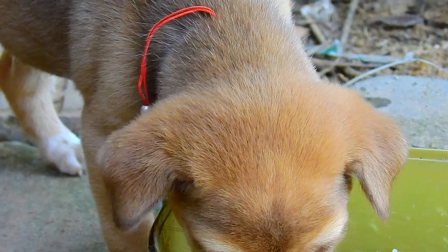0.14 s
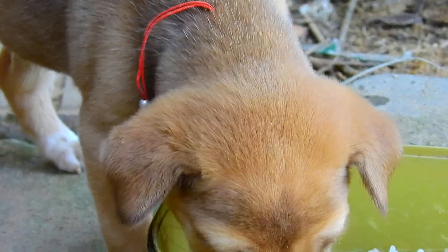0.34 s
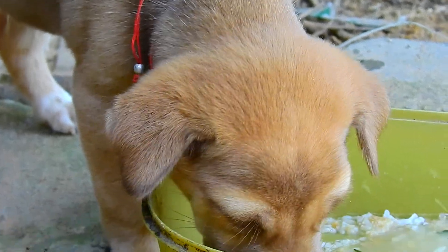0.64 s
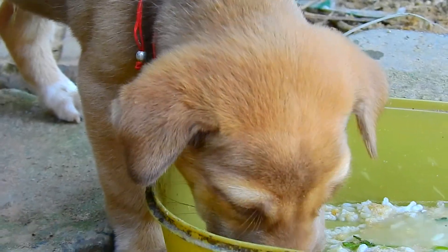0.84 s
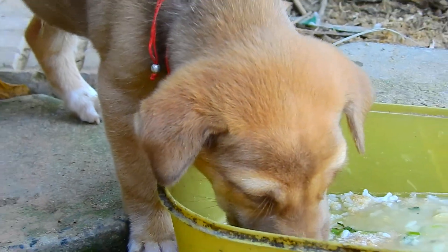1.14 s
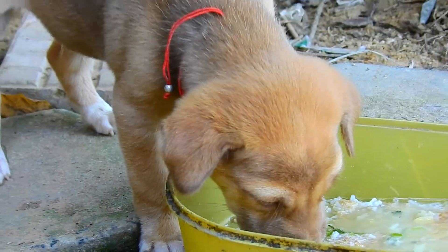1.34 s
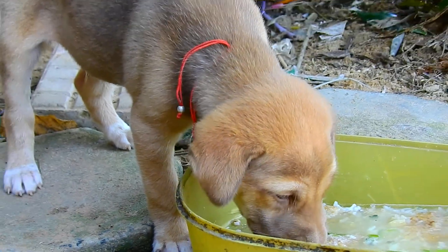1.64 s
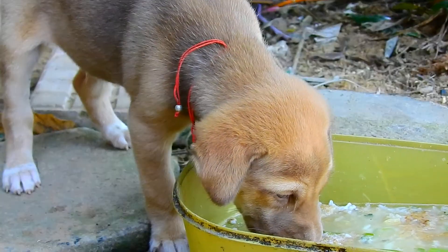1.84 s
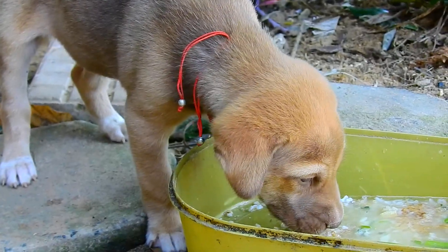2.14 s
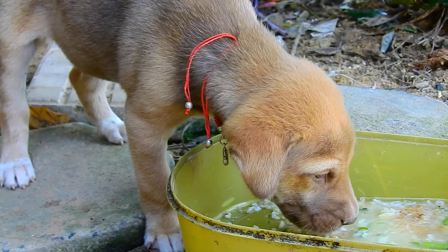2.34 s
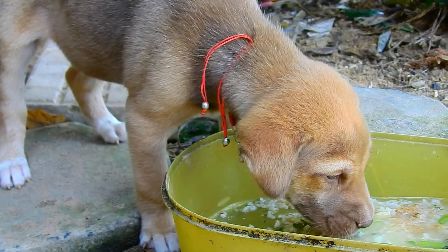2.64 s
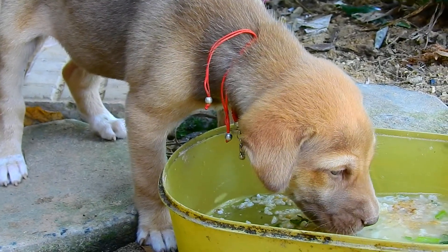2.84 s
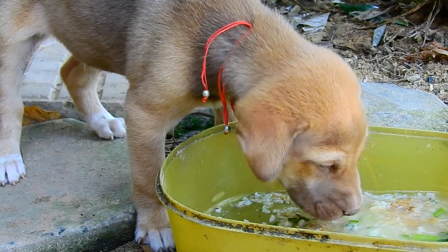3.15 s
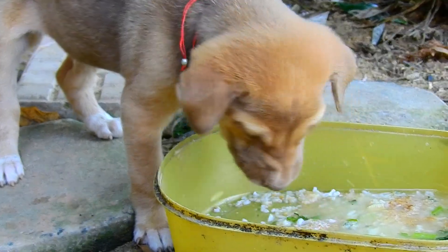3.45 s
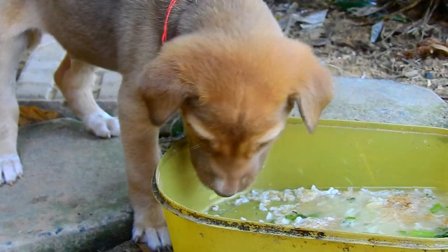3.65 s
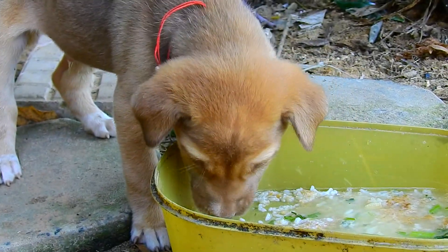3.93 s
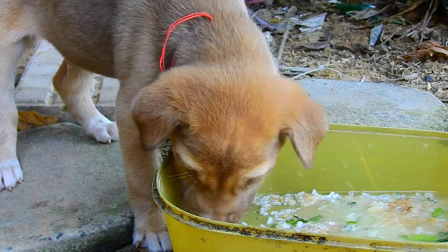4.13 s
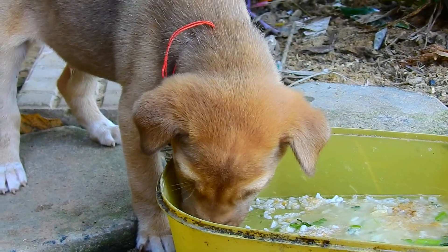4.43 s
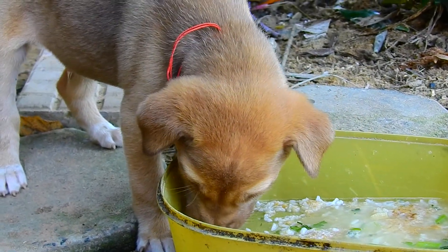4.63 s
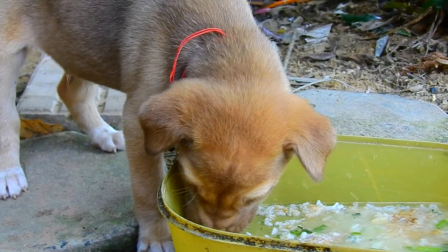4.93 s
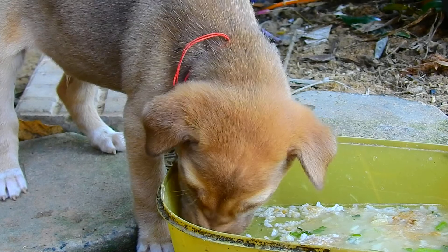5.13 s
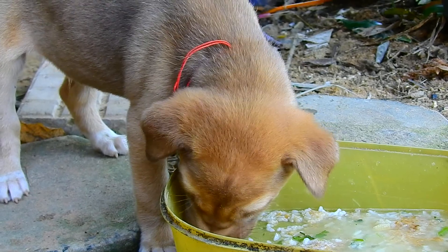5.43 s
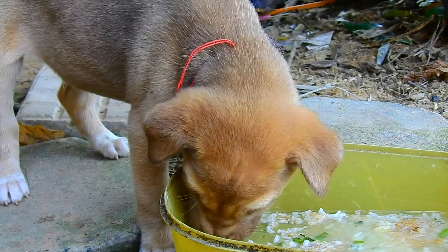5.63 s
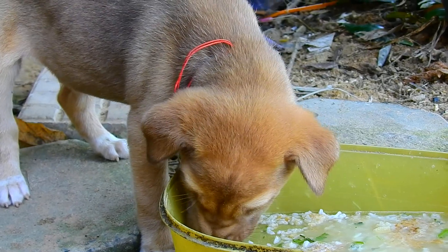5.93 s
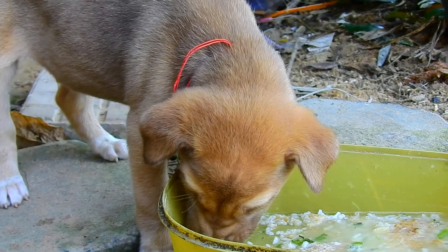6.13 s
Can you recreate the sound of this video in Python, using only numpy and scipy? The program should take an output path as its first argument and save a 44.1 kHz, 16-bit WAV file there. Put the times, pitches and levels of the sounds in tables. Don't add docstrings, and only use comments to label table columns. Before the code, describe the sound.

A close stereo outdoor pickup of a puppy lapping watery rice from a plastic tub. From the start, small wet licks and smacks come irregularly, growing busier at 0.8-1.3 s with bright, fizzy spray and crisp lip clicks; a faint, wavering far whine sounds around 1-1.8 s. Slurps and bubbly gulps continue to about 2.3 s. From 2.4 to 3.1 s the lapping thins as the tub is shoved, giving short gritty scrapes, hollow low knocks and small slips on concrete. Wet smacks return at 3.3 s, with gurgles, building to the juiciest, loudest churning at 3.9-4.6 s. Sharp clicks follow near 4.85 and 5.3 s amid sparser licks. Around 5.9-6.2 s bubbles pop and the tub scrapes and thumps, hardest near 6.05 s. Soft traffic rumble, distant engine idle and airy hiss run throughout.

```python
import sys
import numpy as np
from scipy import signal
from scipy.fft import rfft, irfft
from scipy.io import wavfile
from scipy.ndimage import uniform_filter1d

SR = 44100
rng = np.random.default_rng(int(sys.argv[2]) if len(sys.argv) > 2 else 0)


def field_ratio(decibels):
    return 10 ** (np.asarray(decibels, dtype=float) / 20)


def transcribe(u):
    v = np.clip(np.atleast_2d(u).T, -1, 1)
    q = np.round(v * 32767).astype(np.int16)
    wavfile.write(sys.argv[1], SR, q)


N = 276948

# freq_hz, level_db
YARD_SPECTRUM = [(15, -42), (25, -12.5), (70, 2.5), (133, 1.5), (165, 0.5), (240, -13.5), (553, -13),
                 (763, -15.5), (973, -13.5), (1960, -18.5), (2370, -12), (5450, -26), (6580, -6.5),
                 (7330, -10), (15600, -45)]
# time_s, gain_db
TRAFFIC_SWELL = [
    (0, 3.5),
    (1, 2),
    (2, 6),
    (2.5, 1),
    (3.5, 2.5),
    (4.2, 3),
    (5, 2.5),
    (6.3, 4.5),
]
# time_s, firing_hz, level_db
ENGINE_IDLE = [
    (0, 26.52, -49),
    (1, 26.39, -52),
    (1.7, 27.11, -50),
    (2.7, 27.73, -50.5),
    (3.6, 27.2, -58),
    (4.3, 26.74, -49.5),
    (5, 26.23, -54),
    (6.3, 26.45, -53),
]
# multiple, level_db
ENGINE_ORDERS = [(3, -2), (4, -2), (5, -1), (6, -2), (7, -8.5)]
# time_s, effort_db
CHURN_EFFORT = [(.09, -35), (.47, -34), (.93, -22.5), (1.15, -19), (1.5, -28.5), (1.9, -32), (2.3, -49),
                (2.74, -39), (2.85, -28), (3.3, -30.5), (3.45, -35), (3.84, -27.5), (3.92, -26.5),
                (4.26, -18.5), (4.59, -26.5), (4.83, -32.5), (5.7, -35), (6.28, -32)]
# freq_hz, level_db
FIZZ_SPECTRUM = [(2060, -26.5), (3500, -10.5), (5590, -1), (6330, 4.5), (6960, 4.5), (15600, -40)]
# freq_hz, level_db
SLOSH_SPECTRUM = [(290, -10.5), (500, -8), (762, -8), (931, -6.5), (1730, -6), (5500, -1), (7150, -5.5),
                  (12100, -120)]
# start_s, peak_db, t60_s
SPRAYS = [(.0844, -23, 0.56), (0.276, -15.5, 0.057), (0.539, -17, 0.041), (0.702, -11.5, 0.09),
          (.8531, -12, 0.2), (1.1345, -12, 0.084), (1.1894, -10, 0.09), (1.537, -13, .12),
          (1.768, -15.5, 0.26), (1.908, -8.5, 0.18), (2.048, -15, 0.25), (2.114, -16, 0.23),
          (2.241, -12.5, 0.14), (3.336, -14.5, 0.14), (3.5056, -15.5, 0.09), (3.6323, -19, 0.11),
          (3.904, -9.5, 0.2), (3.966, -7, 0.091), (4.0553, -8, 0.12), (4.2394, -8, 0.057),
          (4.29, -5, 0.078), (4.412, -10, 0.14), (4.4704, -11, 0.28), (4.7228, -20.5, 0.17),
          (5.13, -16.5, 0.22), (5.264, -16, 0.2), (5.452, -14.5, 0.14), (5.487, -10.5, 0.11),
          (5.94, -16, 0.32), (.108, -21, .06), (.18, -19.5, 0.15), (.915, -14, 0.2), (.955, -13, 0.099),
          (1.04, -18, 0.24), (1.0996, -11, .1), (1.25, -15, 0.08), (1.3415, -13, 0.16), (1.675, -22, 0.62),
          (2.2, -17.5, 0.23), (2.305, -21.5, 0.22), (2.385, -21.5, 0.24), (3.922, -13, .06),
          (4.0239, -16, 0.052), (4.0668, -9, .1), (4.1546, -23, 0.079), (4.2, -19, .2), (4.2715, -10, .03),
          (4.335, -11.5, 0.17), (4.5806, -12.5, 0.18), (5.2831, -23, 0.032), (5.34, -19, 0.11),
          (5.5499, -16, 0.11), (5.67, -19.5, 0.19), (6.065, -22, 0.18)]
# start_s, peak_db, t60_s
LIP_SPRAYS = [(.8531, -11, .03), (1.929, -9, .03), (2.55, -24, .12), (2.675, -28, .2), (3.3335, -12, .035),
              (3.3465, -12, .02), (3.626, -19, .06), (4.0553, -7, .04), (4.292, -4, .03),
              (4.7225, -14, .025), (4.73, -18, .05), (4.846, -13, .06), (4.858, -11, .06),
              (5.7769, -17, .03)]
# start_s, peak_db, cavity_hz, t60_s
LAPS = [(0.391, -27.5, 2280, 0.074), (.6556, -25, 2790, 0.52), (0.683, -26, 2720, 0.13),
        (0.845, -24, 2330, 0.25), (1.04, -29, 2000, 0.091), (1.0663, -21.5, 2500, 0.21),
        (1.1185, -23, 3630, 0.19), (1.326, -20.5, 4400, 0.13), (1.4928, -24.5, 2330, 0.1),
        (1.588, -25, 4400, 0.14), (1.621, -21, 2950, 0.24), (1.7595, -21, 2410, 0.09),
        (1.77, -21, 4100, .15), (2.0299, -30.5, 3020, 0.15), (2.07, -27, 4215, 0.29),
        (2.369, -25, 2720, 0.067), (2.575, -23.5, 2060, 0.12), (3.318, -31, 2300, 0.34),
        (3.6153, -25.5, 2800, 0.25), (3.634, -26.5, 1913, 0.22), (3.655, -22, 2540, 0.13),
        (3.9362, -21.5, 2450, 0.29), (4.321, -27, 2760, 0.079), (4.488, -21.5, 4100, 0.096),
        (4.56, -19.5, 4970, 0.45), (4.837, -18.5, 4070, 0.15), (4.846, -15, 4670, 0.19),
        (4.916, -39, 3800, 0.085), (5.0246, -35, 3970, 0.092), (5.109, -23.5, 3900, 0.31),
        (5.334, -33, 4660, 0.084), (5.541, -24, 4960, 0.11), (6.191, -27, 2040, 0.29)]
# start_s, peak_db, cavity_hz, t60_s
GULPS = [(0.075, -24.5, 1950, 0.41), (.345, -31, 2150, 0.081), (0.762, -21.5, 3500, 0.22),
         (0.882, -22, 3650, 0.083), (1.201, -20.5, 2155, 0.16), (1.201, -43, 4690, 0.2),
         (1.9237, -26, 4500, 0.09), (2.221, -19.5, 2660, 0.17), (2.477, -33, 1950, 0.08),
         (2.484, -24, 4080, 0.13), (2.755, -28, 2500, 1), (3.49, -22, 3270, 0.23), (3.85, -16, 3400, 0.32),
         (3.893, -23, 4500, 0.09), (3.976, -20.5, 2620, 0.12), (4.022, -25, 4170, .15),
         (4.0654, -26.5, 4600, 0.18), (4.187, -14, 3900, 0.34), (4.23, -20.5, 3160, 0.75),
         (4.835, -25, 2090, 0.026), (5.6688, -26, 2260, 0.17), (5.711, -26.5, 4600, 0.15),
         (5.8894, -23.5, 4350, .17), (5.93, -23.5, 1370, 0.5)]
# start_s, peak_db, cavity_hz, t60_s
GURGLES = [(.49, -33, 1030, 0.24), (.73, -30.5, 550, 0.17), (1.08, -31, 267, 0.22), (1.29, -32, 360, 0.26),
           (1.627, -19, 3050, 0.075), (1.76, -22, 2270, .12), (1.87, -23.5, 430, 0.046),
           (2.57, -30.5, 595, 0.23), (2.82, -29, 1280, 0.47), (2.89, -28, 1200, .1), (3.02, -29, 1400, .3),
           (3.36, -28.5, 484, 0.26), (3.41, -31, 1300, 0.13), (3.435, -24.5, 880, 0.18),
           (3.555, -27, 945, 0.24), (3.59, -27, 610, 0.14), (3.645, -30, 1600, .15),
           (3.72, -24, 1300, 0.087), (3.755, -33, 590, 0.17), (3.81, -27, 1420, 0.16),
           (3.84, -23, 660, 0.047), (3.88, -28, 890, 0.064), (4.005, -30, 1040, .08),
           (4.22, -32, 540, 0.83), (4.23, -28, 1150, 0.72), (4.35, -28, 520, 0.089),
           (4.72, -28.5, 1080, 0.056), (5.075, -34, 1000, 0.23), (5.2, -34, 1630, 0.34),
           (5.47, -29, 900, 0.092), (5.69, -27.5, 1300, 0.088)]
# start_s, peak_db, cavity_hz, t60_s
POCKETS = [
    (.125, -33, 1150, .2),
    (2.485, -33, 1000, .3),
    (3.1, -27, 1420, .2),
    (3.25, -34, 2400, .3),
    (4.906, -31, 1500, .12),
    (5.48, -24, 3950, .3),
    (5.485, -24, 5050, .1),
    (5.645, -28, 1420, .12),
    (5.655, -27, 2450, .12),
    (5.735, -31, 1950, .1),
]
# start_s, peak_db, pitch_hz, t60_s
BUBBLES = [(0.279, -22.5, 1140, 0.02), (0.386, -33, 810, 0.021), (0.866, -30, 287, 0.099),
           (1.87, -26.5, 1097, 0.046), (1.916, -26.5, 870, 0.04), (1.926, -23, 940, 0.027),
           (2.215, -30.5, 1040, 0.037), (2.676, -25.5, 1020, 0.014), (2.749, -35, 656, 0.11),
           (3.019, -19, 950, 0.022), (3.344, -30, 830, 0.051), (3.628, -23, 900, 0.046),
           (3.719, -18, 1410, 0.028), (3.727, -33, 1090, 0.07), (3.777, -29.5, 730, 0.037),
           (3.81, -31, 1360, 0.024), (3.882, -29, 1496, 0.06), (4.636, -28, 1130, 0.023),
           (4.837, -32, 1330, 0.047), (4.906, -30, 1520, 0.057), (4.962, -30, 1270, 0.03),
           (5.202, -27, 1248, 0.021), (5.234, -26, 1380, 0.03), (5.527, -31.5, 1320, 0.042),
           (5.929, -31, 790, 0.03), (5.963, -15, 750, 0.023), (6.027, -17.5, 1210, 0.015),
           (6.051, -28, 655, 0.023), (6.059, -10, 410, 0.033), (6.148, -24.5, 1260, 0.03)]
# start_s, peak_db, pitch_hz, t60_s
RINGS = [(.3453, -30, 2100, .015), (.3765, -31, 4800, .015), (1.5894, -26, 4420, .012),
         (1.6274, -22, 2980, .012), (2.383, -33, 320, .04), (2.462, -28, 371, .07),
         (2.4779, -29, 1700, .012), (2.749, -29, 950, .04), (2.765, -33, 668, .15), (2.772, -26, 480, .12),
         (2.977, -24, 377, .06), (2.978, -30, 680, .06), (3.018, -23, 358, .05), (3.044, -19, 361, .07),
         (3.9775, -19, 2310, .015), (4.8365, -24, 3000, .008), (4.9144, -21, 3680, .012),
         (4.9255, -24, 4050, .012), (5.0246, -33, 4130, .02), (5.26, -32, 425, .05), (5.289, -28, 479, .04),
         (5.292, -25, 3850, .02), (5.3025, -21, 4050, .014), (5.89, -25, 409, .1), (5.95, -23, 363, .1),
         (6.07, -21, 300, .09), (6.146, -34, 708, .04), (6.182, -26, 361, .05), (6.21, -27, 300, .05)]
# start_s, peak_db
LIP_CLICKS = [(0.8536, -14), (.97, -10), (1.125, -12), (1.918, -20), (1.9295, -23), (3.3343, -19),
              (3.347, -14), (3.9085, -10), (4.0564, -8), (4.2394, -13), (4.2475, -10), (4.2925, -4),
              (4.298, -10), (4.3035, -16), (4.7236, -22), (4.8365, -29), (4.854, -9), (4.9255, -18),
              (5.3026, -7), (5.4557, -28), (5.777, -18)]
# time_s, pitch_hz, level_db
WHINE_PATH = [(0.9, 978, -60), (.97, 950, -52), (1.05, 915, -51), (1.098, 930, -37), (1.13, 958, -51),
              (1.2, 976, -47), (1.315, 923.5, -40.5), (1.4, 974, -49.5), (1.5, 926, -41.5),
              (1.578, 948, -44), (1.61, 974, -51), (1.64, 944, -43), (1.7, 932, -50), (1.75, 900, -54),
              (1.82, 850, -62)]
# start_s, peak_db, t60_s
SPITS = [
    (2.33, -44, .2),
    (4.778, -37, .12),
    (6.24, -46, .15),
]
# start_s, hold_s, scrape_db
SHOVES = [(2.388, .05, -59), (2.448, 0.0088, -33.5), (2.735, 0.051, -27.5), (2.86, 0.04, -20),
          (2.965, 0.023, -24), (3.011, 0.033, -26), (3.084, 0.034, -40), (4.133, 0.16, -36),
          (4.42, 0.084, -35.5), (5.25, 0.013, -27.5), (5.868, 0.04, -22.5), (5.927, 0.07, -24),
          (6.039, 0.014, -19), (6.16, 0.05, -26.5)]
# freq_hz, level_db, t60_s
TUB_MODES = [(163, 1.5, 0.14), (287, -12, 0.1), (380, -10.5, 0.1), (488, -4.5, 0.033), (681, -4.5, 0.031),
             (960, -10.5, 0.046), (1290, 5, 0.0034), (1730, -33, 0.0084)]
# start_s, peak_db, hold_s
KNOCKS = [(2.388, -21, 0.048), (2.488, -22, 0.018), (2.82, -30, 0.046), (2.918, -22, 0.026),
          (2.968, -16, 0.043), (3.016, -13, .02), (3.043, -16, .02), (3.092, -24.5, 0.047),
          (5.465, -18.5, 0.026), (5.888, -18.5, .035), (5.945, -16, 0.037), (6.057, -1, 0.019),
          (6.105, -18, 0.05), (6.178, -32, .01), (6.209, -23, 0.012)]
# start_s, peak_db
SLIPS = [(2.467, -24), (2.749, -29), (2.77, -23), (2.786, -28), (2.871, -29), (2.887, -31), (2.898, -22),
         (2.933, -31), (2.978, -13), (2.986, -23), (3.018, -24), (3.044, -13), (3.056, -20), (5.29, -27),
         (5.89, -17), (5.936, -17), (5.948, -16), (5.959, -6.5), (5.97, -19), (5.982, -21), (6.006, -22),
         (6.049, -22), (6.057, -12), (6.182, -17), (6.192, -21), (6.21, -22), (2.385, -27), (2.478, -30),
         (5.9, -25), (5.915, -27), (6.075, -20), (6.2, -25), (6.222, -26)]
# freq_hz, likeness_ratio
PORT_LIKENESS = [(30, .6), (65, .88), (140, .985), (300, .97), (650, .89), (1400, .86), (3100, .74),
                 (6800, .42), (9500, .3), (15000, .55)]
# freq_hz, lead_rad
PORT_LEAD = [(100, 0.018), (2000, 0.16), (5000, 0.09), (7750, 1.2), (9650, 3.64), (11300, 3.6), (15300, 4)]
# freq_hz, tilt_db
PORT_TILT = [(60, 0.5), (180, -2.5), (550, -0.5), (1650, 2), (4970, 0.5), (15000, -1)]


def seconds(length=N):
    return np.arange(length) / SR


def evened(x):
    return x / np.sqrt(np.mean(x ** 2) + 1e-20)


def read(points, hz):
    f, value = np.transpose(points)
    return np.interp(np.log(hz + 1), np.log(f + 1), value)


def add(mix, start_s, sound):
    part = mix[:, round(start_s * SR):][:, :sound.shape[-1]]
    part += sound[..., :part.shape[1]]


def smoothed(x, size):
    return uniform_filter1d(uniform_filter1d(x, size=size), size=size)


def passed(x, kind, hz, order=3):
    return signal.sosfilt(signal.butter(order, hz, kind, fs=SR, output="sos"), x)


def coloured(x, spectrum):
    hz = np.fft.rfftfreq(x.shape[1], 1 / SR)
    return evened(irfft(rfft(x) * field_ratio(read(spectrum, hz)), x.shape[1]))


def resonate(x, hz, width_hz):
    turn = np.exp(2j * np.pi * np.cumsum(hz * np.ones(x.shape[-1])) / SR)
    r = np.exp(-np.pi * width_hz / SR)
    return 2 * (turn * signal.lfilter([1 - r], [1, -r], x / turn)).real


def grainy(per_s, spread_db, decay_ms, steady):
    size = field_ratio(spread_db * np.minimum(rng.exponential(1, N), 4))
    size *= rng.random(N) < per_s / SR
    flare = signal.lfilter([1], [1, -np.exp(-1000 / (decay_ms * SR))], size ** 2)
    return np.sqrt(steady + flare / flare.mean()) * rng.standard_normal((2, N))


def patchy(x, patch_db, frames, bins):
    z = signal.stft(x, nperseg=512, noverlap=384)[2]
    patches = rng.standard_normal(z.shape[1:])
    for _ in range(2):
        patches = uniform_filter1d(uniform_filter1d(patches, bins, 0), frames, 1)
    z = z * field_ratio(patch_db * evened(patches))
    return evened(signal.istft(z, nperseg=512, noverlap=384)[1][:, :N])


def yard():
    even = coloured(rng.standard_normal((2, N)), YARD_SPECTRUM)
    air = patchy(even, 2.2, 10, 5)
    deep = passed(even - air, "low", 226, order=2)
    air = field_ratio(-39.5) * (air + deep)
    swell = field_ratio(np.interp(seconds(), *np.transpose(TRAFFIC_SWELL)))
    swell *= 1 + 0.25 * np.sin(2 * np.pi * 27 * seconds())
    return air + (swell - 1) * passed(air, "low", 540, order=1)


def idle():
    s, hz, db = np.transpose(ENGINE_IDLE)
    t = seconds()
    phase = 2 * np.pi * np.cumsum(np.interp(t, s, hz)) / SR
    waver = smoothed(rng.standard_normal((len(ENGINE_ORDERS), N)), 5000)
    orders = np.zeros(N)
    for (multiple, order_db), w in zip(ENGINE_ORDERS, waver):
        orders += field_ratio(order_db + 4.2 * evened(w)) * np.cos(multiple * phase)
    return np.sqrt(2) * field_ratio(np.interp(t, s, db)) * orders


def churn_db():
    return np.interp(seconds(), *np.transpose(CHURN_EFFORT))


def fizz():
    power = field_ratio(churn_db() - 3.5)[None] ** 2
    u = seconds(SR // 4)
    lag_s, lap_t60_s = 0.0032, 0.15
    thrown = [(at + lag_s, db, lap_t60_s) for at, db, _, _ in LAPS + GULPS]
    for at, db, t60 in SPRAYS + thrown:
        rise = 1 - np.exp(-u / (0.086 * t60))
        add(power, at, (field_ratio(db - 2.5 - 60 * u / t60) * rise) ** 2)
    for at, db, t60 in LIP_SPRAYS:
        rise = 1 - np.exp(-u / 0.0004)
        add(power, at, (field_ratio(db - 8.5 - 60 * u / t60) * rise) ** 2)
    droplets = coloured(grainy(700, 3.7, 4.4, 0.97), FIZZ_SPECTRUM)
    return np.sqrt(power) * patchy(droplets, 1.84, 6, 10)


def slosh():
    churned = field_ratio(-38 + 0.54 * (churn_db() + 29))
    dragged = field_ratio(-13) * shoving()
    liquid = coloured(grainy(200, 0.73, 12.0, 0.31), SLOSH_SPECTRUM)
    return np.hypot(churned, dragged) * patchy(liquid, 3.74, 8, 6)


def laps():
    out, u = np.zeros((2, N)), seconds(SR // 4)
    wet = grainy(250, 0.73, 19.0, 0.94)
    # rows, rise_oct_per_s, width_ratio
    kinds = ((LAPS, 7.4, 0.35), (GULPS, 1.6, 1), (GURGLES, 0.71, 0.36), (POCKETS, 0.15, 0.041))
    for rows, rise, width in kinds:
        for at, db, hz, t60 in rows:
            drive = np.roll(wet, -round(at * SR), 1)[:, :len(u)]
            path_hz = np.minimum(hz * 2 ** (rise * (u - 0.015)), 9000)
            cavity = resonate(resonate(drive, path_hz, width * hz), path_hz, width * hz)
            swell = 1 - np.exp(-u / (0.063 * t60))
            add(out, at, field_ratio(db - 8.5 - 60 * u / t60) * (0.46 + swell) * evened(cavity))
            smack = np.sin(2 * np.pi * 0.75 * hz * u) + np.sin(2 * np.pi * hz * u)
            smack *= min(2 * width, 1)
            add(out, at, field_ratio(db - 10 - 60 * u / 0.012) * smack)
    return out


def bubbles():
    out, u = np.zeros((2, N)), seconds(SR // 8)
    for at, db, hz, t60 in BUBBLES:
        ring = np.sin(2 * np.pi * hz * (0.982 * u + 1.55 * u ** 2)) * (1 - np.exp(-u / 0.00047))
        ring += 0.5 * np.sin(2 * np.pi * 1.64 * hz * u) * field_ratio(-60 * u / 0.009)
        add(out, at, field_ratio(db - 60 * u / t60) * ring)
        noise = rng.standard_normal((2, len(u)))
        splash = resonate(resonate(noise, 0.92 * hz, 1.2 * hz), 0.92 * hz, 1.2 * hz)
        add(out, at, field_ratio(db - 17.5 - 60 * u / (5.4 * t60)) * evened(splash))
    return out


def rings():
    out, u = np.zeros((2, N)), seconds(SR // 6)
    for at, db, hz, t60 in RINGS:
        strike = 1 - np.exp(-u * hz / 0.4)
        add(out, at, field_ratio(db + 3 - 60 * u / t60) * np.sin(2 * np.pi * hz * u) * strike)
    return out


def lip_clicks():
    out, u = np.zeros((2, N)), seconds(SR // 8)
    ring = np.sin(2 * np.pi * 6500 * u) + 0.35 * np.sin(2 * np.pi * 4600 * u)
    ring *= 1 - np.exp(-u / 0.00015)
    for at, db in LIP_CLICKS:
        add(out, at, field_ratio(db + 5 - 60 * u / 0.0027) * ring)
    return out


def whine():
    s, hz, db = np.transpose(WHINE_PATH)
    t = np.arange(s[0], s[-1], 1 / SR)
    a, b, noise = rng.standard_normal((3, len(t)))
    drift, flutter = evened(smoothed(a, 600)), evened(smoothed(b, 600))
    path_hz = np.interp(t, s, hz) + 4 * drift
    tone = np.sqrt(2) * np.sin(2 * np.pi * np.cumsum(path_hz) / SR)
    tone += 0.31 * evened(resonate(noise, path_hz, 25))
    level = field_ratio(np.interp(t, s, db) - 1 + 1.5 * flutter)
    out = np.zeros((2, N))
    add(out, s[0], tone * level * signal.windows.tukey(len(t), 0.1))
    return out


def spits():
    level, u = np.zeros((1, N)), seconds(SR // 4)
    for at, db, t60 in SPITS:
        add(level, at, field_ratio(db - 60 * u / t60) * (1 - np.exp(-u / 0.0066)))
    hiss = passed(rng.standard_normal((2, N)), "high", 8800)
    return level * evened(passed(hiss, "low", 12000, order=1))


def shoving():
    out, u = np.zeros((1, N)), seconds(SR // 2)
    attack_s, fade_db_per_s = 0.021, 207
    for at, hold, db in SHOVES:
        faded_s = np.maximum(u - attack_s - hold, 0)
        add(out, at, np.minimum(u / attack_s, 1) * field_ratio(db - fade_db_per_s * faded_s))
    return out


def tub_walls(u):
    return np.array([field_ratio(db - 60 * u / t60) * np.sin(2 * np.pi * hz * u) for hz, db, t60 in TUB_MODES])


def scrape():
    walls = tub_walls(seconds(SR // 3)).sum(0)
    grit = grainy(300, 4.8, 5.3, 0.95)
    rung = signal.oaconvolve(grit, walls[None], axes=1)[:, :N]
    return field_ratio(-3.5) * shoving() * evened(rung)


def knocks():
    out, u = np.zeros((2, N)), seconds(SR // 3)
    walls = tub_walls(u)
    sag_oct_per_s, t60_s = 0.56, 0.11
    boom = np.sin(2 * np.pi * np.cumsum(TUB_MODES[0][0] * 2 ** (-sag_oct_per_s * u)) / SR)
    for at, db, hold in KNOCKS:
        held = boom * field_ratio(-60 * np.maximum(u - hold, 0) / t60_s)
        upper = rng.choice([-1., 1.], len(walls) - 1) @ walls[1:]
        add(out, at, field_ratio(db) * (held + 0.27 * upper) * (1 - np.exp(-u / 0.0043)))
    return out


def slips():
    out, u = np.zeros((2, N)), seconds(SR // 6)
    for at, db in SLIPS:
        kick = np.zeros(len(u))
        for hz, mode_db, t60 in TUB_MODES[1:]:
            bent_hz = hz * (1 + 0.056 * rng.uniform(-0.89, 1))
            kick += field_ratio(db + mode_db - 10 - 60 * u / (0.62 * t60)) * np.sin(2 * np.pi * bent_hz * u)
        add(out, at, kick * (1 - np.exp(-u / 0.0011)))
    return out


def ports(pair):
    hz = np.fft.rfftfreq(N, 1 / SR)
    left, other = rfft(pair)
    same = read(PORT_LIKENESS, hz)
    right = same * left + np.sqrt(1 - same ** 2) * other
    right = right * np.exp(-1j * read(PORT_LEAD, hz))
    tilt = field_ratio(read(PORT_TILT, hz) / 2)
    return irfft([left * tilt, right / tilt], N)


def scene():
    lapping = passed(laps(), "low", 6700, order=4)
    popping = passed(bubbles() + lip_clicks(), "low", 6700, order=4)
    scraping, knocking = passed(scrape(), "high", 228), passed(knocks(), "high", 228)
    spread = ports(yard() + fizz() + slosh() + lapping + spits() + scraping)
    return spread + idle() + popping + rings() + whine() + knocking + slips()


def band_limit(x):
    return signal.sosfilt(signal.butter(12, 15720, fs=SR, output="sos"), x)


def record(dry):
    start_s, fade_s = 0.065, 0.01
    fade = np.clip((seconds() - start_s) / fade_s, 0, 1) ** 2
    mix = passed(dry, "high", 37, order=2) * fade
    return band_limit(mix)


dry = scene()
out = record(dry)
transcribe(out)
```